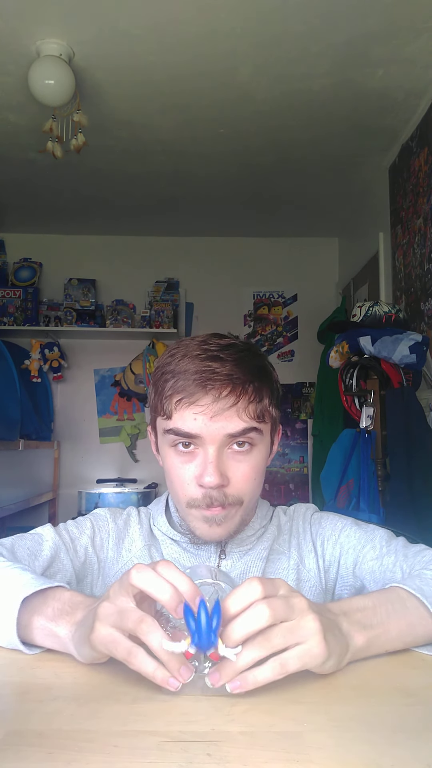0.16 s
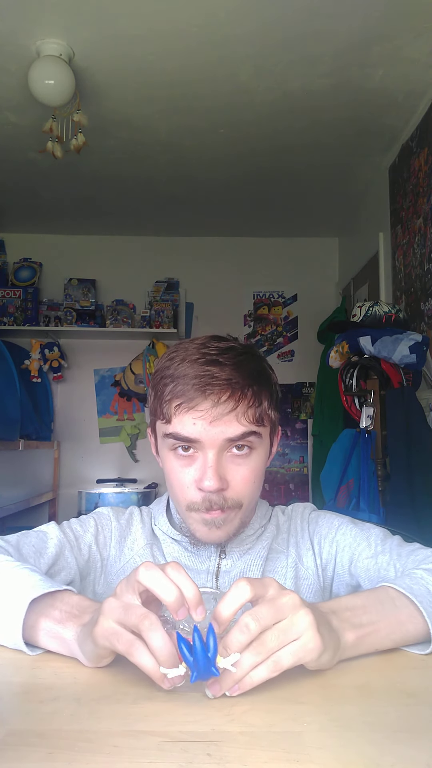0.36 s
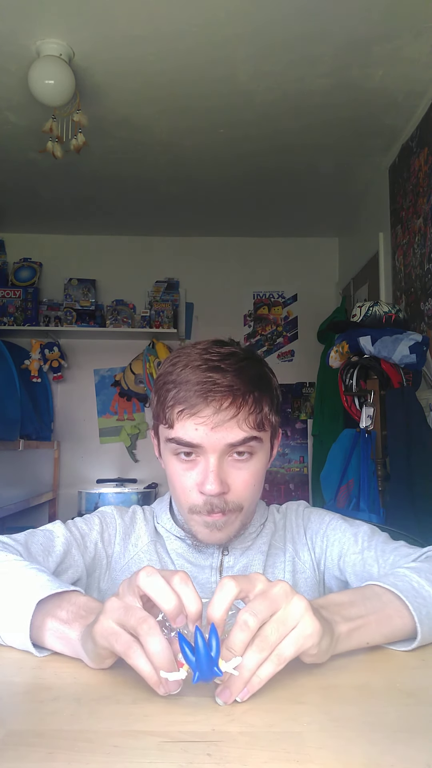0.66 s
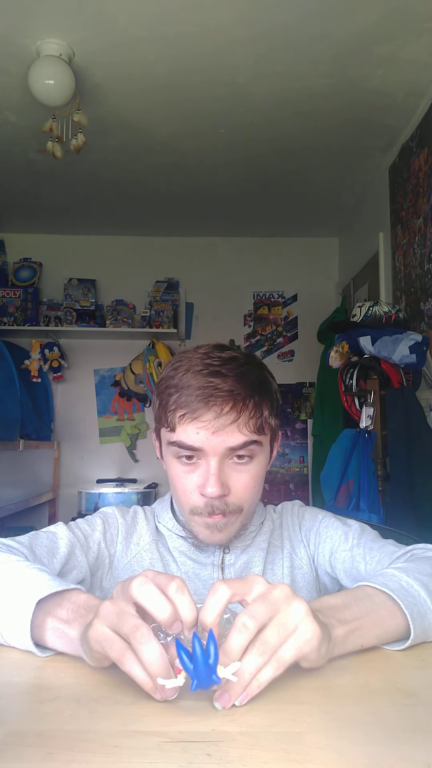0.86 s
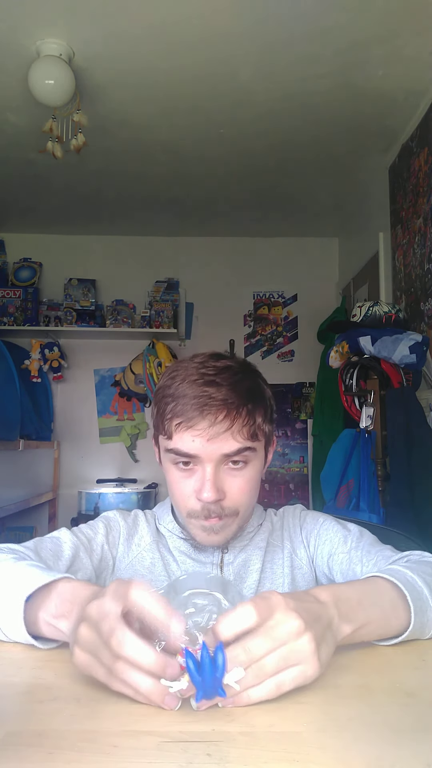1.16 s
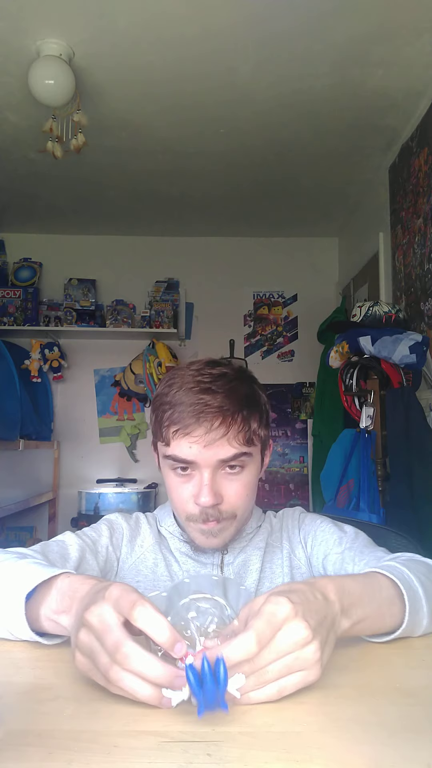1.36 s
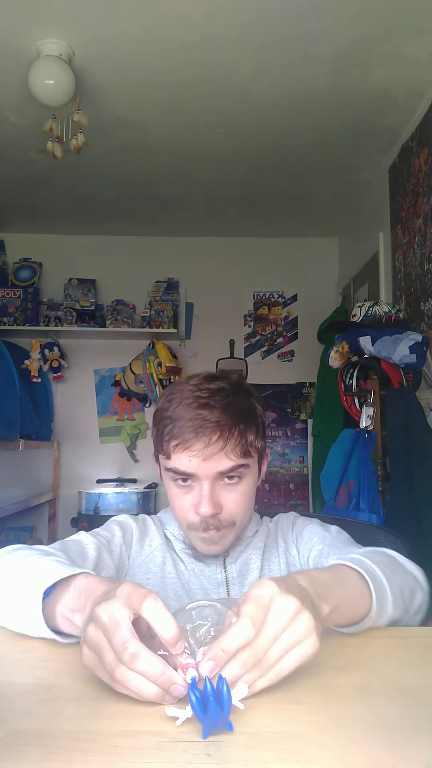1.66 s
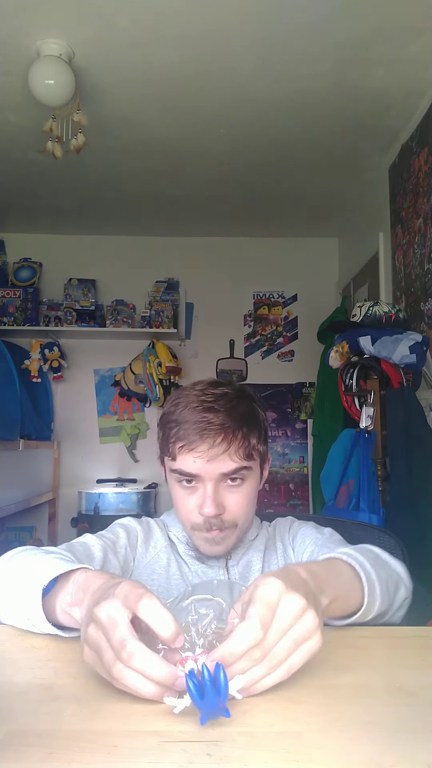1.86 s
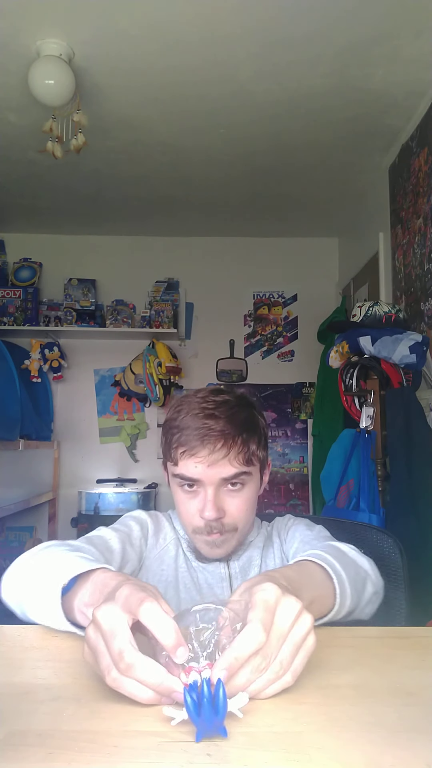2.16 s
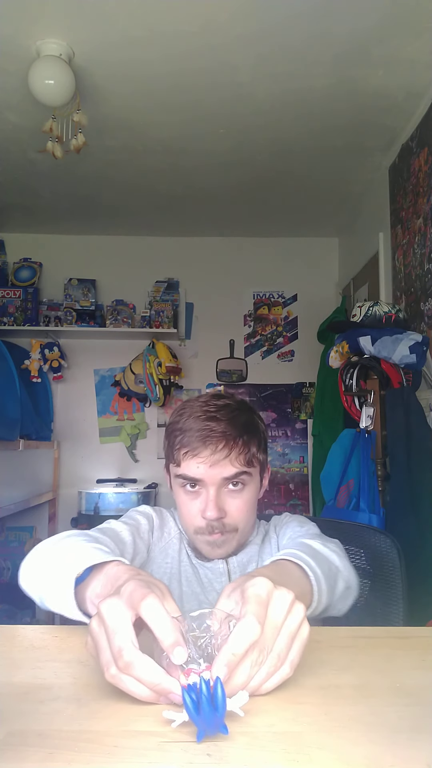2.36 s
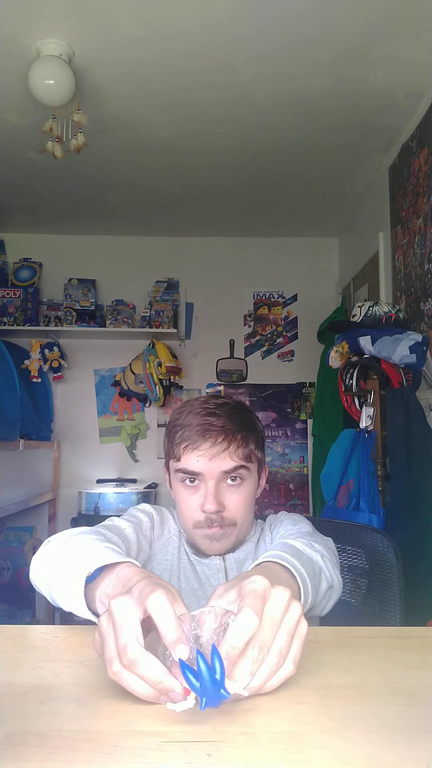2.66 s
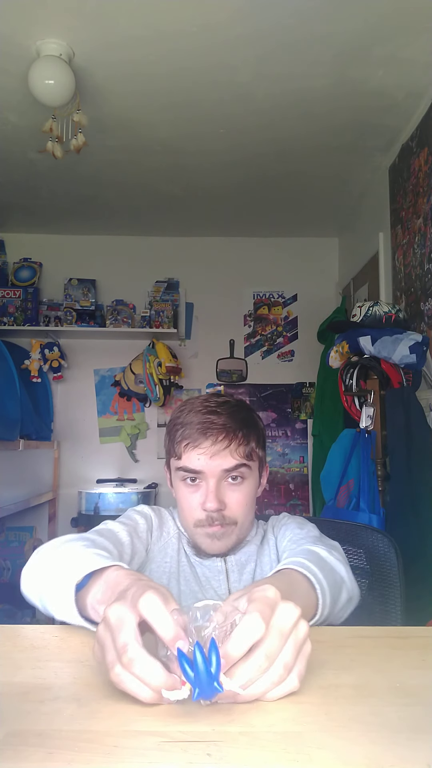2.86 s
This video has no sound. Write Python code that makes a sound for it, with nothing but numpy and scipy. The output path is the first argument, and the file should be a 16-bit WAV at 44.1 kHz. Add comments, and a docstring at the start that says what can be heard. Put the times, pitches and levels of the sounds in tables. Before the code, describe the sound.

Hard plastic pack crackling and popping in twisting hands, with soft bumps on a table.

```python
"""Prying at a blister pack

Hands twist a stiff plastic pack just above a table in a small room, heard by a close microphone pair.
Its creases crinkle in dense slips, its edges tick, and the shell buckles in snaps that ring two broad
resonances for a few cycles. Now and then it bumps the table; twice its flange springs free and rings."""
import sys
import numpy as np
from scipy import signal
from scipy.fft import rfft, irfft, next_fast_len
from scipy.io import wavfile

SR = 44100
rng = np.random.default_rng(int(sys.argv[2]) if len(sys.argv) > 2 else 0)


def file_out(sig):
    """Save sig as 16-bit WAV at sys.argv[1]."""
    # one column per channel
    cols = np.atleast_2d(sig).T
    # limit, then scale
    lim = np.clip(cols, -1, 1)
    pcm = np.round(lim * 32767).astype(np.int16)
    wavfile.write(sys.argv[1], SR, pcm)


N = 132300

SNAP_ATTACK_S, BUMP_ATTACK_S = 0.000896, 0.0012
# spectrum of a plastic edge's click (frequency [Hz], gain [dB])
EDGE_COLOUR = [(300, -23.5), (2000, 8.5), (3000, -2), (5500, 0.5), (7900, 2), (9500, -6.5), (12000, -6.5),
               (13000, -8), (15100, -19), (16000, -7)]


def amp(db):
    """Decibels to gain."""
    return 10 ** (np.asarray(db) / 20)


def along(points, hz):
    """Interpolate (Hz, value) points on a log frequency axis."""
    f, v = np.transpose(points)
    return np.interp(np.log(hz + 1), np.log(f), v)


def unit(x):
    """Scale to rms 1."""
    return x / np.sqrt(np.mean(x ** 2) + 1e-20)


def burst(x, window_s=.01):
    """Scale to the energy of rms 1 over the window."""
    return x / np.sqrt(np.sum(x ** 2) / (window_s * SR) + 1e-20)


def filtered(x, response):
    """Apply a complex frequency response."""
    size = next_fast_len(N + SR // 2)
    return irfft(rfft(x, size) * response(np.fft.rfftfreq(size, 1 / SR)), size)[..., :N]


def coloured(x, points, size=4096):
    """Minimum-phase filter through (Hz, dB) points."""
    cepstrum = irfft(np.log(amp(along(points, np.fft.rfftfreq(size, 1 / SR)))))
    cepstrum[1:size // 2] *= 2
    cepstrum[size // 2 + 1:] = 0
    return signal.fftconvolve(x, irfft(np.exp(rfft(cepstrum))))[:len(x)]


def add(track, at_s, sound):
    """Mix a sound into the track."""
    start = max(0, round(at_s * SR))
    part = track[..., start:start + sound.shape[-1]]
    part += sound[..., :part.shape[-1]]


def fade(t, t60_s):
    """Exponential decay."""
    return np.exp(-np.log(1000) * t / t60_s)


def ring(hz, t60_s, attack_s, size=8192):
    """One damped resonance."""
    t = np.arange(size) / SR
    return np.sin(2 * np.pi * hz * t) * fade(t, t60_s) * (1 - np.exp(-t / attack_s)) ** 2


def crack(colour, t60_s, size=2048):
    """Fast-dying puff of coloured noise."""
    puff = rng.standard_normal(size) * fade(np.arange(size) / SR, t60_s)
    return burst(coloured(puff, colour))


def slips(per_s, scatter_db, uneven):
    """Stick-slip impulses with log-normal gaps and scattered sizes."""
    gap, size, sign = rng.standard_normal((4000, 3)).T
    gaps = np.exp(uneven * gap)
    at = (np.cumsum(gaps / gaps.mean()) * SR / per_s).astype(int)
    heights = amp(scatter_db * np.clip(size, -2, 2)) * np.sign(sign)
    return np.bincount(at[at < N], heights[at < N], N)


def roughened(pulses, t60_s, size=1024):
    """Turn each impulse into a tiny puff of noise."""
    envelope = signal.fftconvolve(abs(pulses), fade(np.arange(size) / SR, t60_s))[:N]
    return envelope * rng.standard_normal(N)


def crinkle():
    """Slipping creases shake the shell and click; finer crackles fill in. Returns body, treble."""
    # crinkle envelope (time [s], body level [dB], treble level [dB])
    levels = [(0,-32,-39.5), (0.038,-44,-63), (0.126,-54.5,-72), (0.174,-37.5,-45), (.22,-29,-37),
              (.29,-30.5,-37.5), (0.361,-32,-49), (.4,-29.5,-38.5), (.5,-29,-39), (.57,-33.5,-46),
              (.655,-37.5,-42.5), (0.721,-28,-39), (.78,-36.5,-43.5), (0.85,-28,-41), (0.913,-38.5,-48),
              (.96,-27,-37.5), (1.1,-38,-42), (1.16,-40.5,-45.5), (1.269,-35,-43.5), (1.349,-72,-85),
              (1.386,-37.5,-50), (1.52,-37,-49.5), (1.592,-26.5,-38.5), (1.7,-37,-48), (1.78,-33,-41),
              (1.9,-42.5,-53.5), (1.954,-32.5,-45.5), (2.07,-29.5,-41), (2.135,-35.5,-42),
              (2.191,-23.5,-37), (2.221,-35.5,-46), (2.4,-35,-41), (2.552,-38.5,-44), (2.585,-36.5,-42),
              (2.68,-30.5,-38), (2.75,-43,-48), (2.84,-38.5,-46), (3,-36.5,-41.5)]
    # dull crinkle as heard, with a low room resonance and the microphone's steep cut near 1.8 kHz
    # (frequency [Hz], gain [dB])
    dull_colour = [(30, -65), (110, -25), (165, -12.5), (220, -17.5), (270, -16.5), (550, -11.5), (760, 2),
                   (1090, 0.5), (1250, 5), (1580, 6.5), (1720, -1), (1900, -26), (2300, -29), (4000, -38)]
    # spectrum of a crease's click (frequency [Hz], gain [dB])
    crease_colour = [(300, -33), (2000, 8), (2900, 10.5), (3500, 3.5), (4700, 1), (7900, 1), (9500, -4.5),
                     (13000, -7.5), (16000, -27)]
    times_s, body_db, treble_db = np.transpose(levels)
    t = np.arange(N) / SR
    pulses = slips(per_s=225, scatter_db=2.2, uneven=.55)
    drive = unit(pulses) + 1.08 * unit(roughened(pulses, t60_s=.012))
    body = unit(coloured(drive, dull_colour))
    clicks = unit(coloured(roughened(pulses, t60_s=.006), crease_colour))
    fine_pulses = slips(per_s=130, scatter_db=3.6, uneven=0.74)
    crackles = unit(coloured(roughened(fine_pulses, t60_s=.002), EDGE_COLOUR))
    treble = amp(-3) * clicks + amp(-4.5) * crackles
    return amp(np.interp(t, times_s, body_db)) * body, amp(np.interp(t, times_s, treble_db)) * treble


def ticks(focus_db=11.5):
    """Stiff edges flick past each other, and one faint buckle clicks; each tick emphasises its own band."""
    # edge flicks, the first a faint buckle that sounds only as a click (time [s], level [dB], band centre [Hz])
    flicks = [(0.0607, -45.5, 1400), (.1817, -36, 4730), (0.2264, -41, 7800), (0.286, -35.5, 8300),
              (0.3776, -30, 12700), (.4272, -33.5, 8500), (.5235, -33, 8400), (0.586, -41, 8150),
              (.605, -38, 8000), (0.6609, -29, 7300), (0.9737, -34.5, 8100), (1.0594, -35.5, 8700),
              (1.0715, -43, 13000), (1.184, -39, 3700), (1.487, -34.5, 3600), (2.252, -37, 5800),
              (2.7203, -38.5, 8600), (2.883, -39, 8600), (2.9445, -43, 8000), (2.9776, -40.5, 8900)]
    out = np.zeros(N)
    for at_s, db, hz in flicks:
        focus = [(hz / np.sqrt(2), -focus_db), (hz, 0), (hz * np.sqrt(2), -focus_db)]
        tick = coloured(crack(EDGE_COLOUR, t60_s=.005), focus)
        add(out, at_s, amp(db) * burst(tick))
    return out


def snaps():
    """Each buckle cracks and rings the shell and its rim. Returns body, treble."""
    # shell buckles (time [s], lower mode [Hz], upper mode [Hz],
    # lower level [dB], upper level [dB], rim level [dB], crack level [dB])
    buckles = [(0.138,760,1540,-48,-40,-48,-45.5), (0.213,835,1515,-25.5,-18,-53,-31),
               (0.2368,810,1470,-26,-22.5,-57,-33), (0.2558,737,1270,-27.5,-21,-44,-47),
               (0.3862,805,1430,-15.5,-16.5,-30,-27), (0.4244,825,1520,-32,-25,-32,-41),
               (0.5037,815,1510,-30,-27,-34.5,-26.5), (0.514,827,1536,-19,-12,-33,-56),
               (0.5276,872,1510,-17.5,-12,-29.5,-30), (0.613,820,1624,-22.5,-20.5,-40,-34),
               (0.7098,800,1456,-38,-25.5,-39,-37.5), (0.9376,880,1477,-19,-20.5,-42,-29.5),
               (1.0739,820,1370,-29,-26,-51,-30.5), (1.0803,970,1530,-29.5,-25,-41,-47),
               (1.1135,860,1550,-21.5,-23,-57,-60), (1.1195,780,1380,-12.5,-19,-30.5,-34),
               (1.2076,754,1466,-19.5,-15,-28,-28), (1.369,760,1380,-37,-34.5,-47.5,-48),
               (1.4878,980,1600,-32.5,-28.5,-32.5,-58), (1.675,733,1450,-19,-14.5,-27.5,-26.5),
               (1.7418,786,1525,-39,-27,-56,-63), (1.929,810,1524,-45,-30.5,-53,-38),
               (1.992,890,1310,-24.5,-28.5,-41,-63), (2.151,760,1530,-35,-33,-33.5,-49),
               (2.1752,738,1240,-22.5,-42,-34,-41), (2.23,800,1410,-42,-24.5,-40.5,-59),
               (2.2511,776,1330,-26,-23.5,-35,-54), (2.4048,795,1190,-25,-23.5,-44,-36),
               (2.5645,507,1406,-26.5,-14,-33,-37), (2.766,976,1310,-17,-13.5,-20.5,-19.5),
               (2.7733,856,1200,-23,-20,-38,-42), (2.9944,795,1330,-49,-24.5,-44,-36.5)]
    # snap's ring as heard, with the microphone's roll-off above about 1.7 kHz (frequency [Hz], gain [dB])
    ring_colour = [(70, -49), (160, -4.5), (220, -1.5), (300, -3.5), (600, -3), (850, 0), (1620, 0.5),
                   (1900, -7), (2300, -13), (4000, -39), (9000, -60)]
    # rim spectrum (frequency [Hz], gain [dB])
    rim_colour = [(300, -22.5), (1700, 0), (2400, -5.5), (2950, 0.5), (3400, -5.5), (4700, -10),
                  (9000, -59)]
    # a tighter buckle rings longer (upper mode [Hz], t60 [s])
    upper_t60_s = [(1440, 0.0059), (1530, 0.0094)]
    body, treble = np.zeros((2, N))
    for at_s, lower_hz, upper_hz, lower_db, upper_db, rim_db, crack_db in buckles:
        lower = ring(lower_hz, t60_s=0.021, attack_s=SNAP_ATTACK_S / 2)
        upper = ring(upper_hz, along(upper_t60_s, upper_hz), SNAP_ATTACK_S)
        add(body, at_s, amp(lower_db - 2.5) * burst(coloured(lower, ring_colour)))
        add(body, at_s, amp(upper_db) * burst(coloured(upper, ring_colour)))
        rim = amp(rim_db - 1.5) * crack(rim_colour, t60_s=0.042)
        edge = amp(crack_db - 4.5) * crack(EDGE_COLOUR, t60_s=0.012)
        add(treble, at_s + SNAP_ATTACK_S, rim + edge)
    return body, treble


def bumps(thud_t60_s=.04):
    """Hands and pack knock the table: brief contacts mostly thud, firm ones let it ring."""
    # table contacts (time [s], pitch [Hz], level [dB], ring t60 [s])
    knocks = [(0.235, 415, -31, 0.041), (.638, 407, -36, 0.017), (1.208, 330, -33.5, 0.018),
              (1.418, 330, -37, 0.031), (1.58, 254, -28, 0.025), (1.991, 296, -30.5, 0.023),
              (2.008, 162, -24, 0.061), (2.302, 302, -32.5, 0.028), (2.322, 195, -28, 0.066),
              (2.765, 458, -25.5, 0.032)]
    # tabletop's bass roll-off (frequency [Hz], gain [dB])
    table_colour = [(40, -20), (140, -0.5)]
    out = np.zeros(N)
    for at_s, hz, db, t60_s in knocks:
        thud_colour = [(hz / 4, -30), (hz / 2, -12), (hz, 0), (hz * 2, -10), (hz * 5, -50)]
        thud = crack(thud_colour, thud_t60_s, size=8192)
        tone = burst(ring(hz, t60_s, BUMP_ATTACK_S))
        tone_share = t60_s / (t60_s + thud_t60_s)
        add(out, at_s, amp(db + 1.5) * (tone_share * tone + (1 - tone_share) * thud))
    return coloured(out, table_colour)


def twangs(t60_s=.1, scatter_db=2):
    """The flat flange springs free and rings briefly."""
    # flange releases (time [s], level [dB])
    releases = [(0.6613, -40.5), (2.7655, -25.5)]
    # flange modes (frequency [Hz], level [dB])
    modes = [(2815, 2), (2960, 2), (3225, -2.5), (5324, -17)]
    out = np.zeros(N)
    for at_s, db in releases:
        twang = sum(amp(mode_db + scatter_db * rng.standard_normal()) * ring(hz, t60_s, SNAP_ATTACK_S / 2)
                    for hz, mode_db in modes)
        add(out, at_s, amp(db) * burst(twang))
    return out


def room(x, tail_db, side_db, early_db, early_t60_s, delay_s):
    """Near reflections and a short tail, redrawn for each block as the pack moves."""
    # room decay (frequency [Hz], t60 [s])
    tail_t60_s = [(150, 0.33), (1200, 0.13), (3000, 0.17), (15000, 0.12)]
    out, hop = np.zeros((2, N)), N // 12
    side_gain = amp(side_db)
    for start in range(0, N, hop):
        hz, t, spectra = signal.stft(rng.standard_normal((2, SR // 3)), SR, nperseg=256)
        tail = signal.istft(spectra * fade(t, along(tail_t60_s, hz)[:, None]), SR)[1]
        early = rng.standard_normal(tail.shape) * fade(np.arange(tail.shape[1]) / SR, early_t60_s)
        tail *= amp(tail_db) / np.linalg.norm(tail[0])
        early *= amp(early_db) / np.linalg.norm(early[0])
        mid, side = tail + early
        pair = np.array([mid + side_gain * side, mid - side_gain * side]) / np.hypot(1, side_gain)
        add(out, start / SR + delay_s, signal.fftconvolve(x[None, start:start + hop], pair, axes=1))
    return out


def boom(x, window_s=.01):
    """A low room mode hangs on after each knock, in opposite phase left and right."""
    mode = ring(hz=166.6, t60_s=0.24, attack_s=BUMP_ATTACK_S, size=16384)
    ringing = signal.fftconvolve(x, mode)[:N] / np.sqrt(window_s * SR)
    return amp(-25) * ringing * np.array([[1], [-.6]])


def port_phase(hz):
    """Response that puts the two microphone ports out of step."""
    # phase between the ports (frequency [Hz], left lead [rad])
    lead_rad = [(1750, 1.5), (2150, 2.5), (3200, 7), (4900, 3), (6800, 10), (9500, 14.5), (13200, 8),
                (15000, 17.5)]
    return np.exp(.5j * along(lead_rad, hz) * np.array([[1], [-1]]))


def port_balance(hz):
    """Constant-power gains of the two ports, louder on the left."""
    # level between the ports (frequency [Hz], left minus right [dB])
    left_db = [(100, 4.6), (800, 0.093), (4400, 0.78), (8000, 8.5), (15000, 0.41)]
    left = amp(along(left_db, hz))
    return np.array([left, np.ones_like(hz)]) * np.sqrt(2) / np.hypot(1, left)


def hush():
    """Faint steady noise, independent in each channel."""
    # background spectrum (frequency [Hz], gain [dB])
    colour = [(20, -12), (150, 2), (1500, -14), (2200, -22), (15000, -32)]
    return amp(-63) * np.array([unit(coloured(noise, colour)) for noise in rng.standard_normal((2, N))])


def scene():
    """Pack in the room: the direct body reaches both ports in phase, the treble out of step."""
    snap_body, snap_treble = snaps()
    crinkle_body, crinkle_treble = crinkle()
    body = crinkle_body + snap_body + bumps()
    treble = crinkle_treble + snap_treble + ticks() + twangs()
    direct = body + filtered(treble, port_phase)
    # early scatter: body off the table, treble off the fingers
    wet = room(body, tail_db=-9, side_db=-8, early_db=-11.5, early_t60_s=0.033, delay_s=0.002998)
    wet += room(treble, tail_db=-2.5, side_db=0, early_db=-6, early_t60_s=0.015, delay_s=.0003)
    return filtered(direct + wet + boom(body), port_balance) + hush()


def record(dry):
    """The recorder rounds off the highest peaks and cuts everything above its band limit."""
    ceiling, top_hz = .95, 16000
    rounded = dry / (1 + (dry / ceiling) ** 6) ** (1 / 6)
    return filtered(rounded, lambda hz: hz < top_hz)


dry = scene()
out = record(dry)
file_out(out)
```